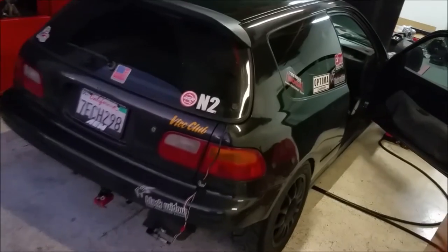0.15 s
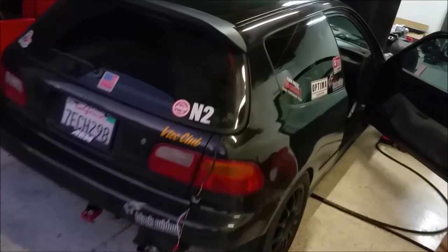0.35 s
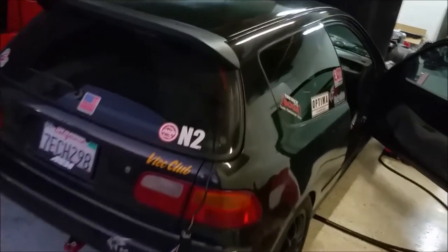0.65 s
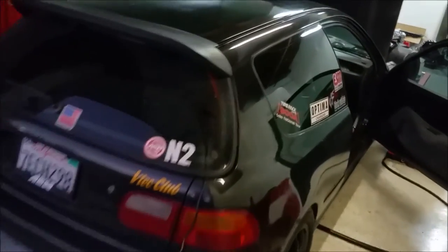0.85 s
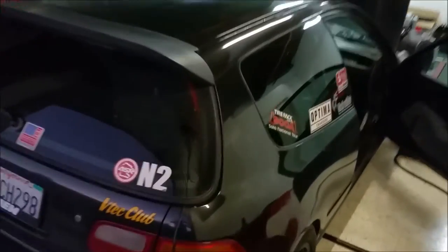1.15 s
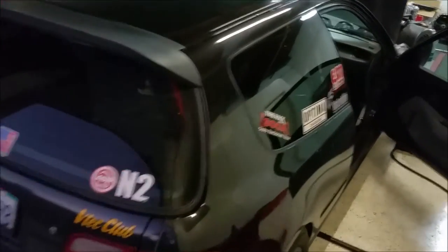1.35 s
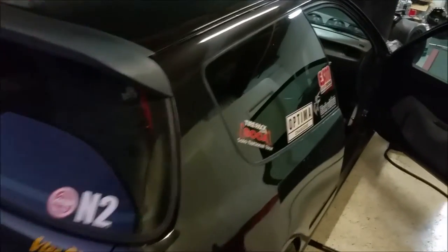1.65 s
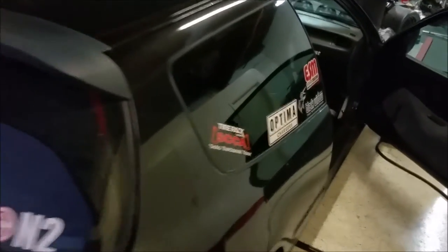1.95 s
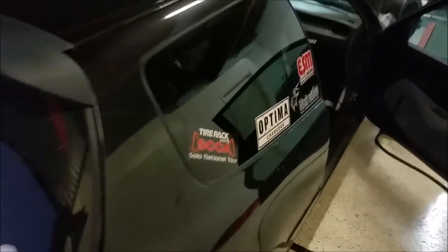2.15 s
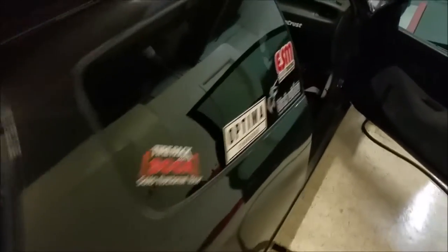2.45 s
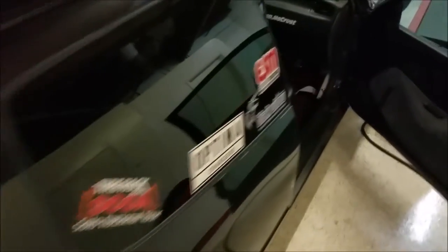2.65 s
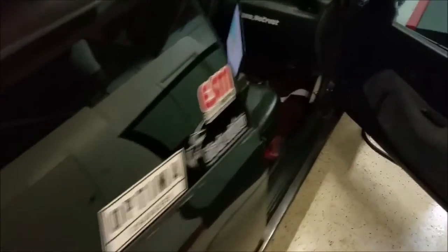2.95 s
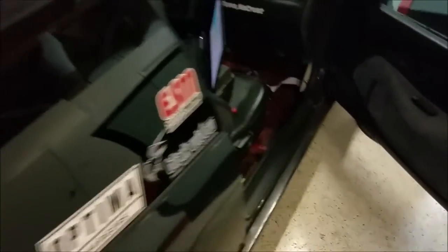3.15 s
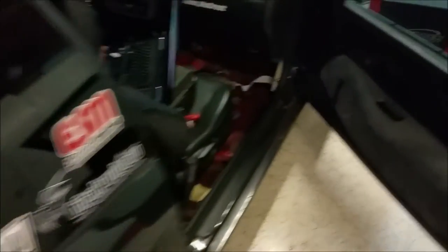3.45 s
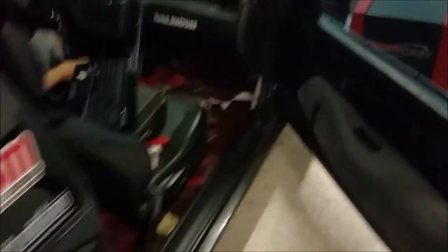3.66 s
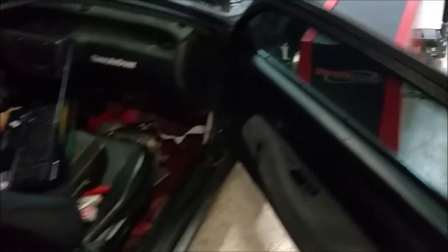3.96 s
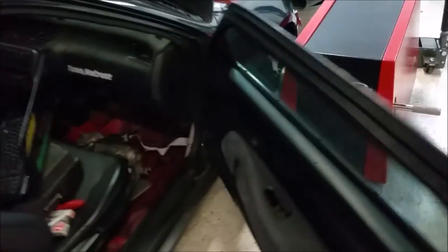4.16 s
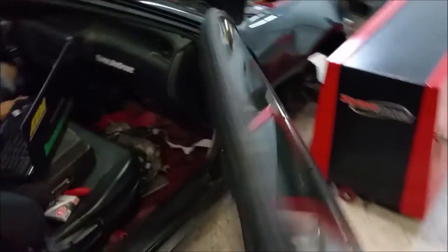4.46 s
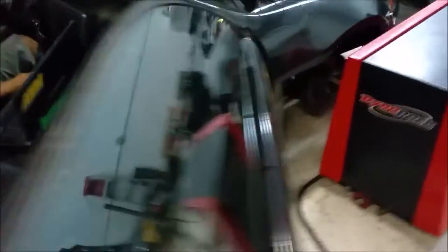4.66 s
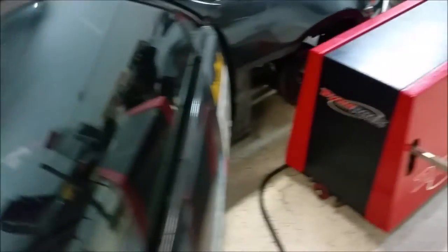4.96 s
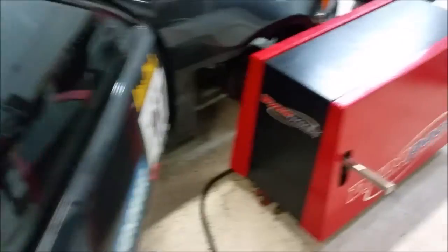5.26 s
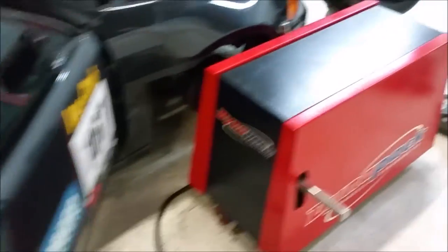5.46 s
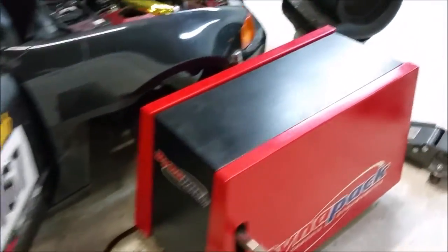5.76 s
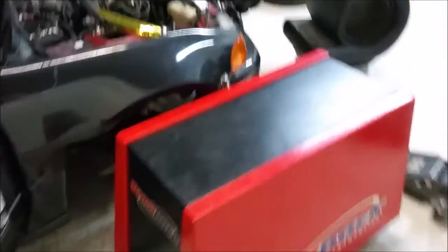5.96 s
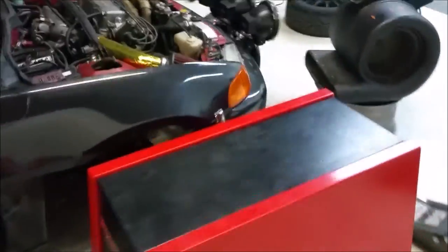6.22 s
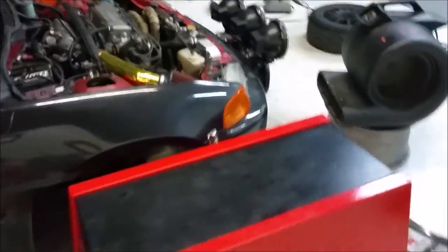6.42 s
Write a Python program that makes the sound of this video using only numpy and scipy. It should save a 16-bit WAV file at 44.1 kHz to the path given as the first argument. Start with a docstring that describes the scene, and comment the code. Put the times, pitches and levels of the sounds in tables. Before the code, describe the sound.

A four-cylinder car idles unevenly in a hard-floored workshop, its speed swinging up and down about every three seconds. A handheld microphone starts behind the booming exhaust, passes the open door where the cabin rings and hums, and ends near the engine bay, where belts, blower and fans rush louder. Airy valve hisses appear as the idle dips.

```python
"""A four-cylinder engine booms with a lumpy, hunting idle (1100-1500 rpm) in a workshop.
Uneven firing pulses ring exhaust and body resonances; sines locked to the crank add boom and cabin hum.
Shaped noise makes the rush of belts, blower and fans, throbbing once a cycle, and the idle valve's hiss.
The microphone walks from the tailpipe past the open door to the engine bay."""
import sys
import numpy as np
from scipy.fft import rfft, irfft, next_fast_len
from scipy.io import wavfile
from scipy.ndimage import map_coordinates

SR = 44100
rng = np.random.default_rng(int(sys.argv[2]) if len(sys.argv) > 2 else 0)


def to_wav(s):
    """Save 16-bit WAV."""
    ch = np.atleast_2d(s).T  # columns
    pcm = np.round(np.clip(ch, -1, 1) * 32767)  # PCM
    wavfile.write(sys.argv[1], SR, pcm.astype(np.int16))


N = 290619
SIZE = next_fast_len(N + SR)
HZ = np.fft.rfftfreq(SIZE, 1 / SR)
TIME = np.arange(N) / SR
IDLE_RPM = 1336.7  # mean speed

# microphone walk: (time [s], way from tail 0 to engine bay 1 [ratio], exhaust gain [dB])
WALK = [(0, 0, -1), (1.4, 0.18, 3), (2.2, 0.18, 0.7), (3.1, 0.29, 3), (3.7, 0.39, 1.1), (4.3, 0.65, 1.5),
        (5.1, 0.78, -1.5), (6.1, 1, -0.5), (6.59, 1, -1.5)]


def amp(db):
    """Decibels to gain."""
    return 10 ** (np.asarray(db) / 20)


def along(points):
    """(Hz, value) points joined on a log-frequency axis."""
    f, v = np.transpose(points)
    return np.interp(np.log(HZ + 1), np.log(f + 1), v)


def curves(rows):
    """One value per sample for each column after the time."""
    s, *cols = np.transpose(rows)
    return [np.interp(TIME, s, c) for c in cols]


def wobble(rate_hz):
    """Smooth random curve, rate_hz knots a second."""
    knots = rng.standard_normal(int(N * rate_hz / SR) + 4)
    return map_coordinates(knots, [TIME * rate_hz])


def filtered(x, response):
    """x through a frequency response, by circular convolution over SIZE samples."""
    return irfft(rfft(x, SIZE) * response, SIZE)[..., :N]


def resonances(modes):
    """Causal response of (Hz, width Hz, dB) modes, alternating in sign."""
    total = 0
    for k, (centre_hz, width_hz, db) in enumerate(modes):
        damping = 1j * HZ * width_hz
        total = total + (-1) ** k * amp(db) * damping / (centre_hz ** 2 - HZ ** 2 + damping)
    return total


def panned(x, pan_db):
    """x leaning left by pan_db, left over right."""
    return x * amp(np.vstack([pan_db, -pan_db]) / 2)


def noise(response):
    """Stereo noise, mid rms 1; the likeness of the ears varies with frequency."""
    # left-right likeness: (frequency [Hz], correlation [ratio])
    likeness = [(150, 0.52), (270, 1), (500, 0.61), (900, 0.11), (3000, -0.044), (10000, -.1)]
    turn = np.arccos(np.clip(along(likeness), -.9, .99)) / 2
    weights = np.array([np.cos(turn), np.sin(turn)])
    mid, side = filtered(rng.standard_normal((2, SIZE)), response * weights)
    return np.array([mid + side, mid - side]) / np.std(mid)


def room_ripple(depth_db, step_hz):
    """Reflections from walls and floor leave random peaks and dips in a steady noise."""
    knots = rng.standard_normal(SR // 2)
    return amp(depth_db * np.interp(HZ / step_hz, np.arange(len(knots)), knots))


def engine_rpm():
    """The idle control overshoots, so the speed swings up and down about its mean."""
    swing_rpm, hunt_period_s, crest_s = 194.2, 3.004, .728  # crest_s: near the first crest
    lean_rad = .112  # falls faster than it climbs
    trough_rpm = 19  # troughs sharper than crests
    swing = 2 * np.pi * (TIME - crest_s) / hunt_period_s
    leaning = np.cos(swing - lean_rad * np.cos(swing))
    return IDLE_RPM + swing_rpm * leaning - trough_rpm * np.cos(2 * swing)


def revs():
    """Engine speed in octaves over its mean."""
    return np.log2(engine_rpm() / IDLE_RPM)


def engine_cycles():
    """Four-stroke cycles done so far, two crank turns each."""
    return np.cumsum(engine_rpm()) / (2 * 60 * SR)


def beyond(way, width):
    """Smooth rise from 0 to 1 as the microphone passes a place along the car."""
    return .5 + .5 * np.tanh((curves(WALK)[0] - way) / (2 * width))


def approach(tail_db, bay_db, db_per_octave, bend):
    """Level in dB of an engine-bay sound: up with nearness and speed; bend over 1 delays the rise."""
    way = np.clip(curves(WALK)[0], 0, 1)
    return tail_db + (bay_db - tail_db) * way ** bend + db_per_octave * revs()


def firings(cycles, scatter_db, jitter_s):
    """One pulse per cylinder and cycle; burns scatter in time and size, more so at low speed."""
    # exhaust pulses: (place in the two-turn cycle [0-1], size [gain])
    cylinders = [(.165, .89), (.37, .74), (.616, .95), (.903, .96)]
    lumpiness = 1.7  # doublings of scatter per octave of lost speed
    place, size = np.transpose(cylinders)
    when = (np.arange(-4, int(cycles[-1]) + 1)[:, None] + place).ravel()
    spread = 2 ** (-lumpiness * np.interp(when, cycles, revs()))
    chance = rng.standard_normal((len(when), 2)) * spread[:, None]
    # already running: earlier firings get negative indices, which the circular filter carries in
    at = np.where(when < 0, when / cycles[0], np.interp(when, cycles, np.arange(N)))
    at = at + jitter_s * SR * chance[:, 0]
    pulses = np.zeros(SIZE)
    pulses[at.astype(int)] = np.resize(size, len(when)) * amp(scatter_db * chance[:, 1])
    return pulses


def order(cycles, count):
    """Sine of rms 1 locked to the crank, count periods per engine cycle."""
    return np.sqrt(2) * np.sin(2 * np.pi * count * cycles)


def exhaust_drone(cycles):
    """Firing pulses ring fixed exhaust and room resonances, from rear to side colour on the walk."""
    # modes behind the car: (frequency [Hz], width [Hz], gain [dB])
    rear_modes = [(82.7, 11.7, -19.5), (105.02, 7.65, -14), (119.8, 28, -32.5), (139, 6.5, -35),
                  (157.4, 9.6, -39)]
    # modes beside the car: (frequency [Hz], width [Hz], gain [dB])
    side_modes = [(85.3, 15.6, -30.5), (107.3, 10.2, -24.5), (127.6, 15, -31.5), (149.9, 6.2, -29)]
    flank = beyond(way=.57, width=.05)
    pulses = amp(66.0) * firings(cycles, scatter_db=1.14, jitter_s=0.00037)
    ragged = amp(70.5) * firings(cycles, scatter_db=2.2, jitter_s=0.00048)  # less even beside the car
    low_pass = 1 / (1 + (HZ / 230) ** 6)
    high_pass = HZ ** 4 / (HZ ** 4 + 48 ** 4)
    muffler = low_pass * high_pass
    rear = filtered(pulses, resonances(rear_modes) * muffler)
    beside = filtered(ragged, resonances(side_modes) * muffler)
    return amp(curves(WALK)[1]) * ((1 - flank) * rear + flank * beside)


def firing_boom(cycles):
    """Deep firing note: orders 4 and 5 of the cycle beat together and grow with speed."""
    # base level before speed and wobble: (time [s], level [dB])
    boom_level = [(0, -43), (.9, -30.5), (1.6, -43.5), (2.25, -33), (2.8, -50), (4.5, -50), (5.45, -26),
                  (5.9, -45), (6.59, -32)]
    db_per_octave = 30
    boom_db = curves(boom_level)[0] + db_per_octave * revs() + 1.3 * wobble(6.7)
    return amp(boom_db) * (order(cycles, 4) + amp(-5) * order(cycles, 5))


def cabin_hum(cycles):
    """Cabin air hums at two engine orders as the open door goes by."""
    door_s, half_length_s, peak_db = 4.0, 0.17, -29.5
    passing = 1 / (1 + ((TIME - door_s) / half_length_s) ** 2)
    return amp(peak_db) * passing * (order(cycles, 18) + amp(-8.5) * order(cycles, 42))


def exhaust(cycles):
    """Drone, boom and hum share a bearing, set by level and delay between the ears."""
    # bearing: (time [s], left over right [dB], delay of left behind right [s])
    bearing = [(0, .7, 0), (1.9, .3, .0003), (4.4, 1.9, .0001), (5.3, .3, .00005), (6.59, .2, -.0001)]
    sound = exhaust_drone(cycles) + firing_boom(cycles) + cabin_hum(cycles)
    pan_db, lag_s = curves(bearing)
    ears = [np.interp(TIME + ear * lag_s / 2, TIME, sound) for ear in (-1, 1)]
    return panned(np.array(ears), pan_db)


def panels(cycles):
    """Rough combustion knocks shake the body and ring in the cabin, heard through the open door."""
    # body panel modes: (frequency [Hz], width [Hz], gain [dB])
    body_modes = [(183, 61, -46.5), (222.6, 12, -38), (260, 13, -42), (498, 61, -52)]
    # cabin modes: (frequency [Hz], width [Hz], gain [dB])
    cabin_modes = [(216.2, 11, -41.5), (465, 45, -43.5), (526, 35, -44)]
    shut_db, open_db = -24, -.5  # cabin gain at mean speed, before and after it comes into earshot
    knocks = amp(59.5) * firings(cycles, scatter_db=3.0, jitter_s=0.0004)
    damping = 1 / (1 + (HZ / 800) ** 4)
    body_db = approach(tail_db=-2.5, bay_db=3.0, db_per_octave=2.5, bend=0.84)
    cabin_db = shut_db + (open_db - shut_db) * beyond(way=.19, width=.025) + 9 * revs()
    body = amp(body_db) * filtered(knocks, resonances(body_modes) * damping)
    cabin = amp(cabin_db) * filtered(knocks, resonances(cabin_modes) * damping)
    return body + cabin


def machinery(cycles):
    """Fans, belts and supercharger rush as noise bands; all flutter, those above the rumble throb."""
    # spectra before room ripple, relative: (frequency [Hz], density [dB per Hz])
    rumble_spectrum = [(110, -31.5), (185, -1), (231, -1.5), (323, -10), (440, -10), (479, -7.5),
                       (650, -11), (840, -46.5), (1430, -120)]
    roar_spectrum = [(380, -31), (650, -3.5), (1020, -0.5), (1120, -3), (1840, -0.5), (2200, -8.5),
                     (2860, -39), (4840, -120)]
    hiss_spectrum = [(1290, -27), (2200, -11), (2350, -1.5), (3060, -4.5), (3430, -6), (3720, -4),
                     (4230, -7), (4790, -6.5), (6240, -14.5), (7380, -25.5), (8000, -28.5), (10400, -59.5),
                     (17600, -120)]
    fizz_spectrum = [(4410, -28.5), (7500, -7), (8830, -0.5), (11300, 0.5), (15500, -2.5)]
    rumble_db = approach(tail_db=-34.5, bay_db=-27.5, db_per_octave=1.5, bend=.85)
    roar_db = approach(tail_db=-35.0, bay_db=-29.0, db_per_octave=2.0, bend=1.0)
    hiss_db = approach(tail_db=-45.5, bay_db=-37.5, db_per_octave=2.5, bend=1.07)
    fizz_db = approach(tail_db=-60.0, bay_db=-51.5, db_per_octave=5, bend=2.0)
    throb_db = 0.67 * np.cos(2 * np.pi * (cycles - .37)) + 0.45 * wobble(22)  # once a cycle
    roar_shape = amp(along(roar_spectrum)) * room_ripple(depth_db=1.43, step_hz=22.1)
    hiss_shape = amp(along(hiss_spectrum)) * room_ripple(depth_db=1.3, step_hz=47.3)
    rumble = amp(rumble_db + 0.8 * wobble(11)) * noise(amp(along(rumble_spectrum)))
    roar = amp(roar_db + throb_db + 0.71 * wobble(90)) * noise(roar_shape)
    hiss = amp(hiss_db + throb_db + 0.67 * wobble(140)) * noise(hiss_shape)
    intake = amp(throb_db) * air_valve_hiss()
    fizz = amp(fizz_db + 1.2 * throb_db + .6 * wobble(200)) * noise(amp(along(fizz_spectrum)))
    return rumble + panned(roar, -.9) + panned(hiss + intake, -3.0) + panned(fizz, -0.9)


def shudder():
    """A low, irregular rumble fills the workshop: steady low-passed noise."""
    # relative spectrum before the low-pass: (frequency [Hz], density [dB per Hz])
    shudder_spectrum = [(15, -13), (30, -5), (45, -2.5), (70, -2.5), (150, -1), (220, -46)]
    low_pass = 1 / (1 + (HZ / 250) ** 4)
    return amp(-39) * noise(amp(along(shudder_spectrum)) * low_pass)


def air_valve_hiss():
    """The valve opens quickly to catch the falling idle, then closes slowly; its hiss fades and sinks."""
    # openings near the bottom of each swing: (time [s], initial level [dB], initial pitch [ratio to modes])
    valve_opens = [(2.25, -45.5, 1.005), (5.05, -41.5, 1.04)]
    # intake modes before the pitch ratio: (frequency [Hz], width [Hz], gain [dB])
    intake_modes = [(3770, 180, 1.5), (4680, 400, -5.5)]
    attack_s, close_db_per_s, sag_per_s = 0.06, 3.5, .025  # sag: pitch ratio lost per second
    sound = np.zeros((2, N))
    for start_s, db, pitch in valve_opens:
        age_s = np.maximum(TIME - start_s, 0)
        air = noise(resonances(intake_modes) * resonances([(4100, 2800, 0)]))
        read_s = age_s * (pitch - sag_per_s * age_s / 2)  # ever slower playback lowers the pitch
        sinking = np.array([np.interp(read_s, TIME, ear) for ear in air])
        attack = 1 - np.exp(-age_s / attack_s)
        sound += attack * amp(db - close_db_per_s * age_s) * sinking
    return sound


def scene():
    """One crankshaft times exhaust, panels and machinery; the shudder runs free."""
    cycles = engine_cycles()
    return exhaust(cycles) + panels(cycles) + machinery(cycles) + shudder()


def record(dry):
    """Sharp band limit: nothing passes from top_hz up."""
    top_hz = 15750
    return filtered(dry, HZ < top_hz)


dry = scene()
out = record(dry)
to_wav(out)
```